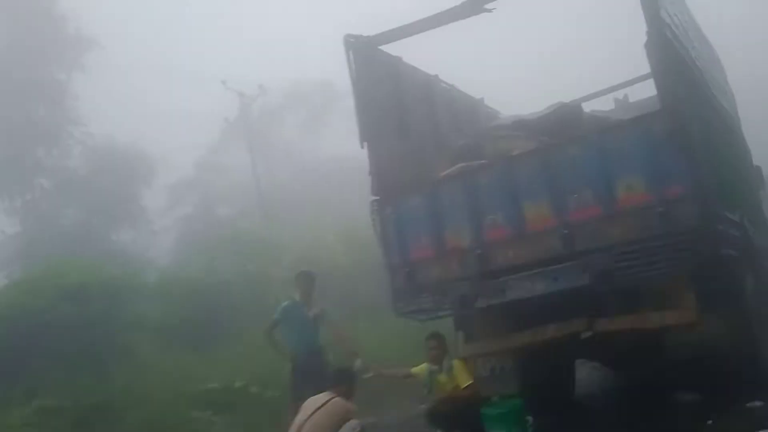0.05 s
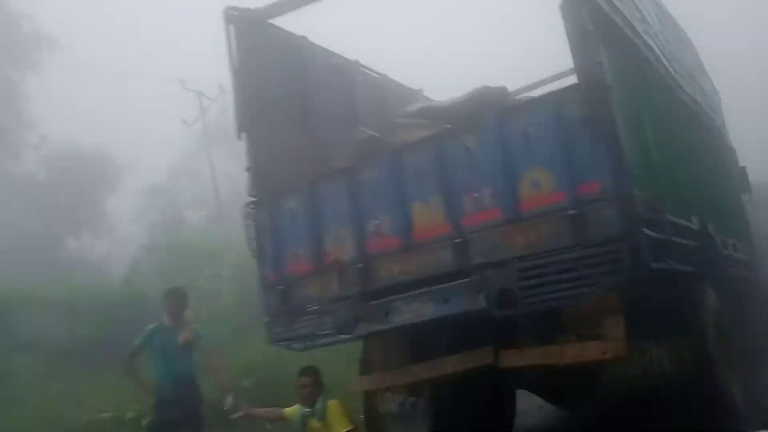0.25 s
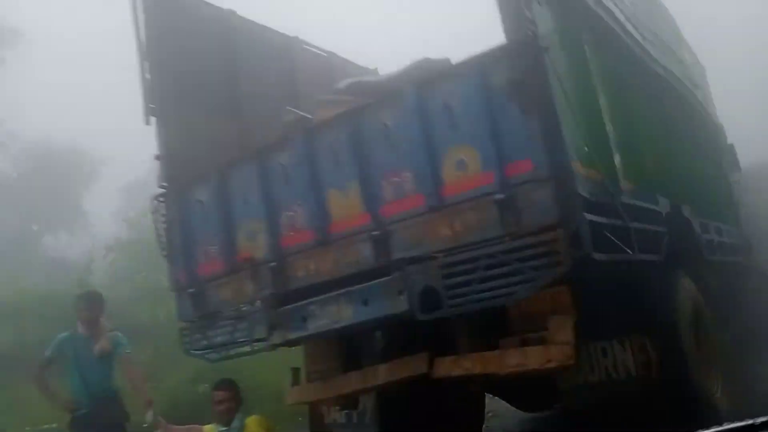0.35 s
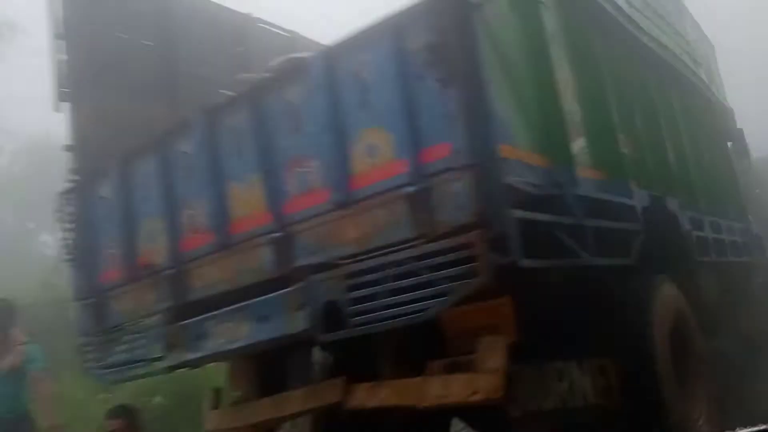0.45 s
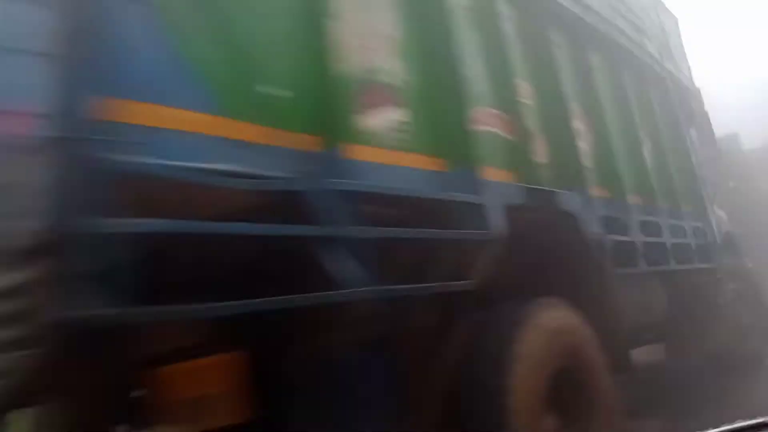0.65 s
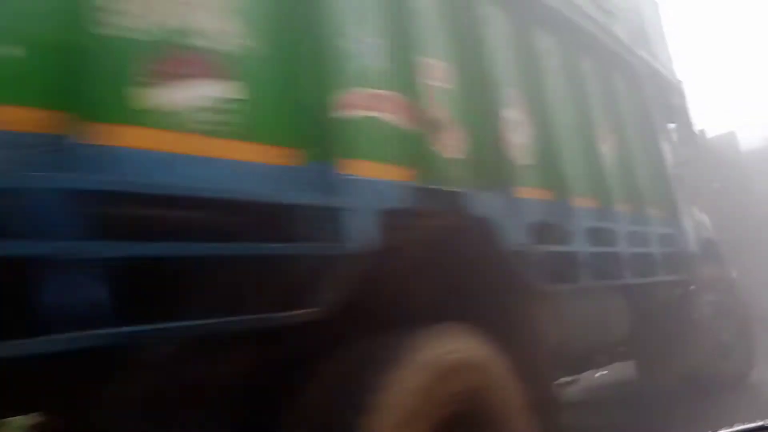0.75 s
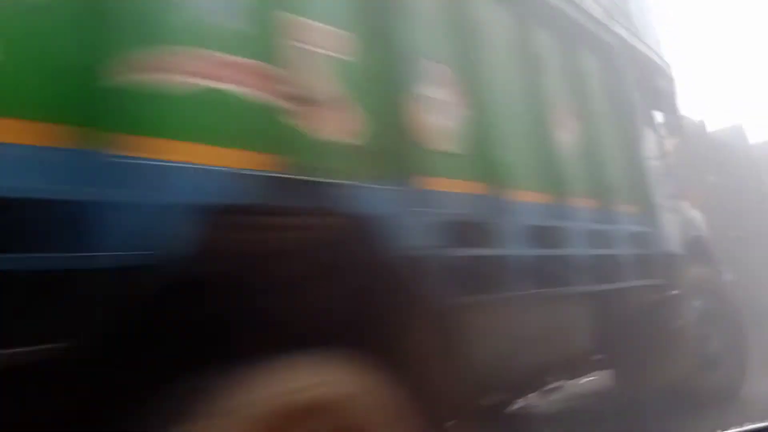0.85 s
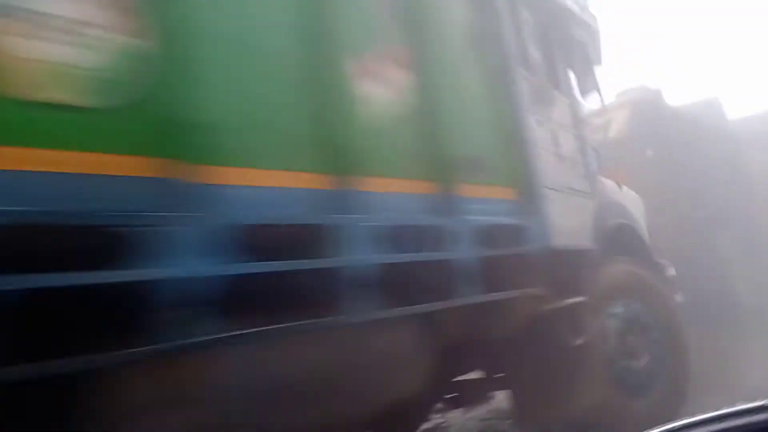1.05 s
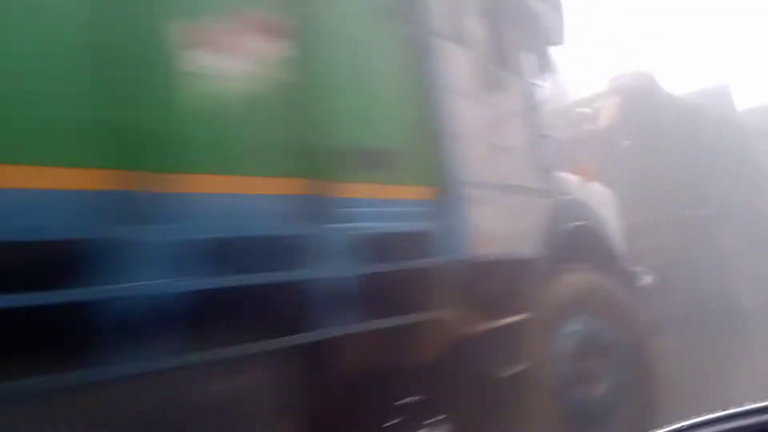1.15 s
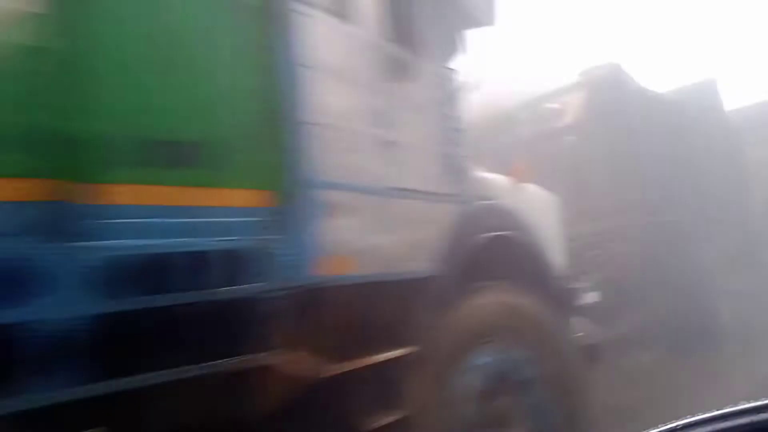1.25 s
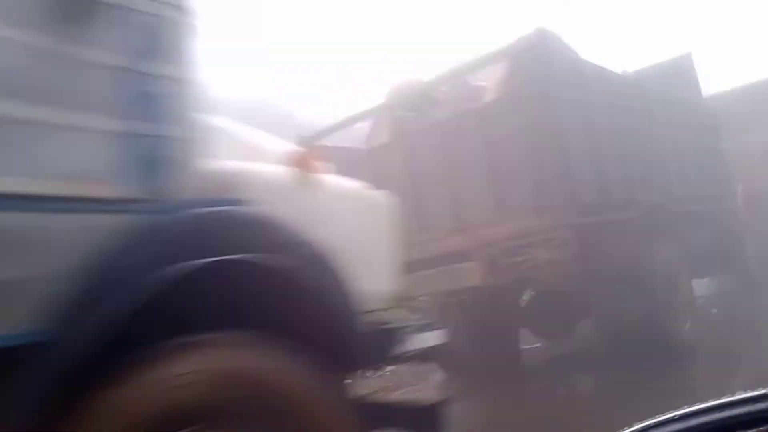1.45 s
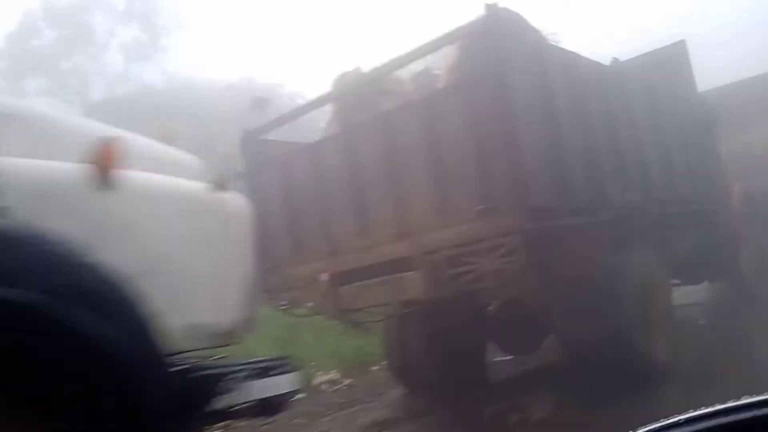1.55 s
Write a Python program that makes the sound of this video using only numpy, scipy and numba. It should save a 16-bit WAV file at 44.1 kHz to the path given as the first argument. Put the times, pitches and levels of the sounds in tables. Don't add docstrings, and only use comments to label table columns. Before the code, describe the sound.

Four buzzing car horn beeps bounce off truck sides above low engine rumble and tyre hiss

```python
import sys
import numpy as np
from scipy import signal
from scipy.fft import rfft, irfft
from scipy.io import wavfile
from scipy.ndimage import uniform_filter1d
from numba import njit

SR = 44100
rng = np.random.default_rng(int(sys.argv[2]) if len(sys.argv) > 2 else 0)


def waveform_to_disk(signal):
    frames = np.transpose(np.atleast_2d(signal))
    scaled = np.clip(frames, -1, 1) * 32767
    samples = np.round(scaled).astype(np.int16)
    wavfile.write(sys.argv[1], SR, samples)


def decibels_to_gain(level_db):
    exponent = np.asarray(level_db, float) / 20
    return 10 ** exponent


N = 70560
T_S = np.arange(N) / SR
TOP_HZ = 15720

# [down t/s, up t/s, low horn level/dB, high horn level/dB, treble level/dB]
PRESSES = [
    (0.197, 0.367, -3, -1, -2.5),
    (0.424, 0.588, -2.5, 2, -2.5),
    (0.799, 1.029, -3, -1, -2.5),
    (1.087, 1.264, 0.5, 2.5, 1.5),
]


def level(x, db):
    return x * decibels_to_gain(db) / np.sqrt(np.mean(x ** 2))


def band(x, hz, width_hz):
    return signal.lfilter(*signal.iirpeak(hz, hz / width_hz, SR), x)


def walk(rate_hz):
    k = int(SR / rate_hz)
    steps = np.repeat(rng.standard_normal(N // k + 1), k)
    return 1.412 * uniform_filter1d(uniform_filter1d(steps, k), k)[:N]


def bell(at_s, width_s):
    return np.exp(-.5 * ((T_S - at_s) / width_s) ** 2)


def bands(table, flicker_db, rate_hz):
    hz, db = np.array(table).T
    noise_hz = np.fft.rfftfreq(N, 1 / SR) + 1
    shape = decibels_to_gain(np.interp(np.log(noise_hz), np.log(hz), db, left=-120, right=-120))
    out = 0
    for centre_oct in np.arange(np.log2(hz[0]), np.log2(hz[-1]) + 1 / 3, 1 / 3):
        share = np.sqrt(np.clip(1 - 3 * abs(np.log2(noise_hz) - centre_oct), 0, 1))
        flicker = decibels_to_gain(flicker_db * walk(rate_hz))
        out = out + flicker * irfft(rfft(rng.standard_normal(N)) * shape * share, N)
    return out


@njit
def follow(x, up, down):
    y, e = np.empty(len(x)), 0.
    for i in range(len(x)):
        e += (x[i] - e) * (up if x[i] > e else down)
        y[i] = e
    return y


def car():
    # [f/Hz, density level/dB per Hz]
    road = [(18, -42), (30, -16.5), (70, -8), (106, -4.5), (146, -6), (237, -7), (417, -15.5), (455, -13),
            (600, -25), (780, -71), (1320, -120)]
    # [f/Hz, density level/dB per Hz]
    spray = [(600, -5.5), (1100, -12), (2000, -3), (3600, -12), (7300, -15), (8000, -24.5), (12500, -30.5),
             (15800, -37)]
    # [t/s, level/dB]
    flank = [(0, 5), (.4, 6), (.75, 4), (1.0, 18.5), (1.35, 11.5), (1.45, 10.5), (1.53, 11), (1.6, 12.5)]
    # [f/Hz, level/dB]
    engine = [(68, -56), (107, -55), (137, -51), (195, -54)]
    rumble = level(bands(road, 4.1, 8), -44)
    hums = 0
    for hz, db in engine:
        strength = decibels_to_gain(db + 2.65 * walk(12.96))
        turning_hz = hz * (1 + 0.04934 * walk(14))
        hums = hums + strength * np.sin(2 * np.pi * np.cumsum(turning_hz) / SR)
    hiss = level(bands(spray, 4.5, 14.12), -56) * decibels_to_gain(np.interp(T_S, *np.array(flank).T))
    return rumble + hums + hiss


def horn(hz, harmonics_db, top_db, slow, press_db):
    swing_up_s, swing_down_s = .014 * slow, 0.037 * slow
    treble_up_s, treble_down_s = 0.029, 0.017
    start_flat, stop_flat, wobble = .03, .02, 0.00166
    fall_db, bright_power = -0.9057, 0.49
    shimmer_db, buzz_db = 1.5, -62
    rasp_db, rasp_hz = -7, 119.64

    down = sum(np.clip((T_S - p[0]) * 1e3, 0, 1) * np.clip((p[1] - T_S) * 1e3, 0, 1) for p in PRESSES)
    swing = follow(down, 1 / (swing_up_s * SR), 1 / (swing_down_s * SR)) + 1e-9
    strike = follow(swing ** 2, 1 / (treble_up_s * SR), 1 / (treble_down_s * SR))
    spans_s = np.ravel([(p[0], p[1] + .05) for p in PRESSES])
    force = decibels_to_gain(np.interp(T_S, spans_s, np.repeat(press_db, 2)))
    strike = strike * decibels_to_gain(np.interp(T_S, spans_s, np.repeat([p[4] for p in PRESSES], 2)))
    flat = (1 - swing) * (start_flat * down + stop_flat * (1 - down))
    phase = 2 * np.pi * np.cumsum(hz * (1 - flat + wobble * walk(40.15))) / SR

    buzz = band(rng.standard_normal(N), 4600, 5200)
    out = decibels_to_gain(buzz_db) * strike * (1 + np.cos(phase)) * buzz
    listed = len(harmonics_db)
    for k in range(1, int(TOP_HZ / hz)):
        if k <= listed:
            db = harmonics_db[k - 1]
            grow = swing ** (1 + bright_power * np.log2(k) * 2)
        else:
            db = top_db + fall_db * (k - 1 - listed)
            grow = strike
        strength = np.sqrt(2) * decibels_to_gain(db + shimmer_db * (walk(29.75) + walk(9.04)))
        rasp = 1 + decibels_to_gain(rasp_db) * min(k, 3) / 3 * walk(rasp_hz)
        out += strength * grow * rasp * np.sin(k * phase + 2 * np.pi * rng.random())
    return force * out


def echo(fine, at_s, lag_s, shift_pct, db, hz, lit_s):
    heard_s = T_S - lag_s + (T_S - at_s) * shift_pct / 100
    moved = np.interp(heard_s, np.arange(len(fine)) * N / SR / len(fine), fine)
    return decibels_to_gain(db) * bell(at_s, lit_s) * band(band(moved, hz, 0.79 * hz), hz, 2 * hz)


def trucks(x, count=110):
    # [best lit t/s, lag t/s, pitch shift/%, level/dB, favoured f/Hz]
    faces = [(0.268, 0.022, 2.8, -1, 964), (0.329, 0.039, 3, 0, 1760), (0.358, .025, 4.5, -10, 2200),
             (0.498, 0.016, 2.5, 1.5, 1410), (.53, .04, 4, -7.5, 1750), (0.599, 0.029, 3, 0.5, 1760),
             (0.658, .08, 2.5, -9.5, 1750), (0.878, 0.012, 2, 4.5, 1515), (0.919, 0.034, 2.5, -3, 2200),
             (.96, 0.021, 0, -4, 2630), (1.032, .012, -1.12, 5, 810), (.97, .012, 0.9, -3, 430),
             (.86, 0.014, 0.93, -3.5, 1360), (1.028, 0.026, 1.5, 0, 2160), (1.169, 0.033, 3, -2.5, 1080),
             (1.199, 0.038, 3.5, -3, 1940), (1.248, .02, 1.4, -1, 2270), (1.29, 0.044, 1.5, -7, 1760)]
    # [t/s, mean pitch shift/%, spread/%]
    bearing = [(0.198, 2.3, 1.24), (.6, 2.16, 1.34), (.85, 0.45, 0.89), (1.02, 0.16, 1.8),
               (1.15, 1.6, 1.54), (1.3, 1.84, 1.3)]
    face_lit_s, glint_s = 0.074, 0.05
    scatter_db, scatter_t60_s, scatter_hz = 4.5, 0.27, 2200
    tail_db, tail_t60_s = -24.5, 0.46

    fine = signal.resample_poly(x, 4, 1)
    out = sum(echo(fine, *face, face_lit_s) for face in faces)
    when_s, mean_pct, spread_pct = np.array(bearing).T
    for k, (a, b, c) in enumerate(rng.random((count, 3))):
        at_s = (k + b) / count * N / SR
        lag_s = .012 + .12 * a
        shift_pct = np.interp(at_s, when_s, mean_pct) + np.interp(at_s, when_s, spread_pct) * (2 * c - 1)
        db = scatter_db - 60 * lag_s / scatter_t60_s
        out += echo(fine, at_s, lag_s, shift_pct, db, scatter_hz * (0.67 + 4.1 * b ** 2), glint_s)
    tail_s = np.arange(SR // 2) / SR
    decay = decibels_to_gain(-60 * tail_s / tail_t60_s) * (tail_s > .02)
    wash = level(rng.standard_normal(len(tail_s)) * decay, tail_db) / np.sqrt(len(tail_s))
    return out + signal.fftconvolve(x + out, wash)[:N]


def kicks():
    hz, db, width_s, lag_s = 543, -36.5, 0.01, 0.014
    return sum(decibels_to_gain(db) * bell(p[1] + lag_s, width_s) * np.cos(2 * np.pi * hz * T_S) for p in PRESSES)


def knocks():
    # [t/s, level/dB, f/Hz]
    bumps = [
        (1.4, -58, 236),
        (1.415, -38, 226),
        (1.435, -44, 166),
        (1.471, -42.5, 231),
        (1.484, -41, 242),
        (1.495, -39.5, 228),
        (1.554, -52, 250),
    ]
    # [t/s, level/dB, f/Hz, t60/s]
    rattles = [
        (1.424, -41.5, 2000, 0.038),
        (1.538, -42.5, 1130, 0.061),
        (1.578, -36, 2380, 0.038),
        (1.59, -42, 2200, 0.028),
    ]
    out = 0
    for s, db, hz in bumps:
        out = out + decibels_to_gain(db) * bell(s, 0.0085) * np.cos(2 * np.pi * hz * (T_S - s))
    for s, db, hz, t60_s in rattles:
        burst = rng.standard_normal(N) * (T_S > s) * decibels_to_gain(-60 * np.clip(T_S - s, 0, 1) / t60_s)
        out += 6 * decibels_to_gain(db) * band(band(burst, hz, .5 * hz), hz, hz)
    return out


def scene():
    low_harmonics_db = [-36, -36, -30, -34, -33, -35, -41.5, -43.5, -55, -58, -55, -58.5, -63.5]
    high_harmonics_db = [-30.5, -39, -43.5, -38, -52, -46, -52.5, -67]
    low_press_db, high_press_db = np.array(PRESSES).T[2:4]
    horns = horn(425.33, low_harmonics_db, -59.5, 0.94, low_press_db)
    horns = horns + horn(493.5, high_harmonics_db, -63.5, 0.81, high_press_db)
    return (car() + horns + trucks(horns) + kicks() + knocks())[None]


def low_pass(x):
    return signal.sosfilt(signal.butter(12, 16730, fs=SR, output="sos"), x)


def record(dry):
    port_hz, port_width_hz, port_db = 15800, 1460, 12
    low_cut_hz, drive = 45, 1.1
    x = dry + decibels_to_gain(port_db) * band(band(dry, port_hz, port_width_hz), port_hz, 2 * port_width_hz)
    x = np.tanh(drive * x) / drive
    x = signal.sosfilt(signal.butter(3, low_cut_hz, "high", fs=SR, output="sos"), x)
    x = signal.sosfilt(signal.ellip(10, .2, 70, TOP_HZ, fs=SR, output="sos"), x)
    return low_pass(x)


dry = scene()
out = record(dry)
waveform_to_disk(out)
```